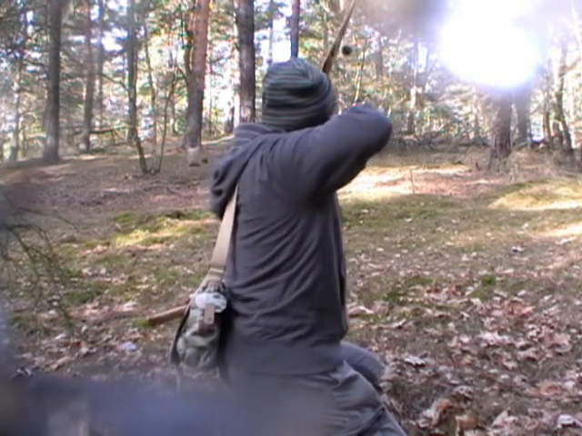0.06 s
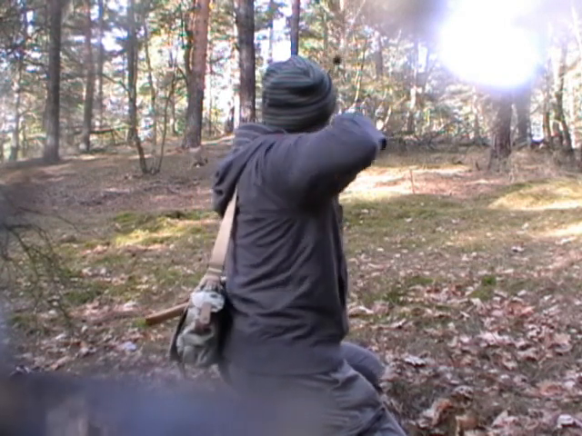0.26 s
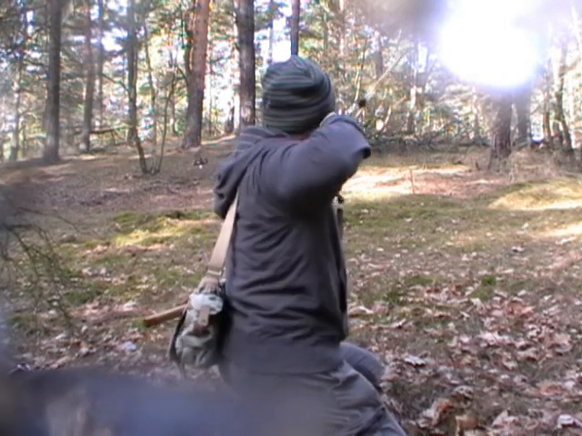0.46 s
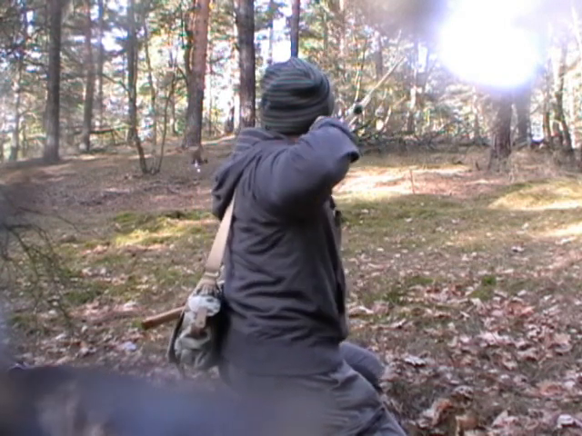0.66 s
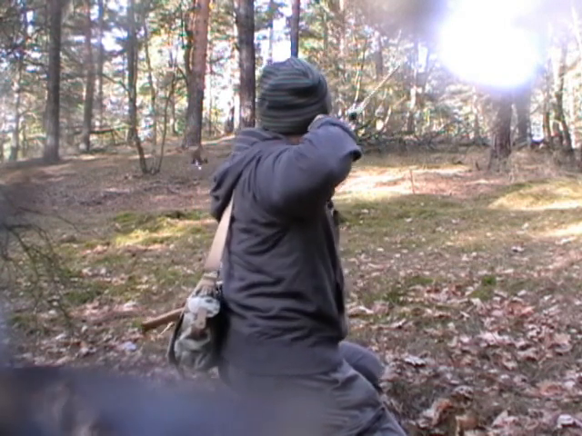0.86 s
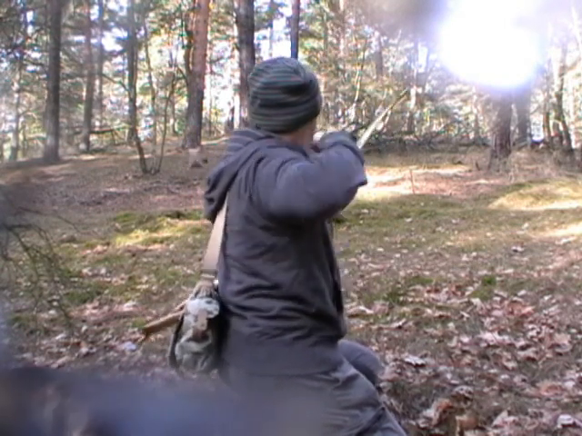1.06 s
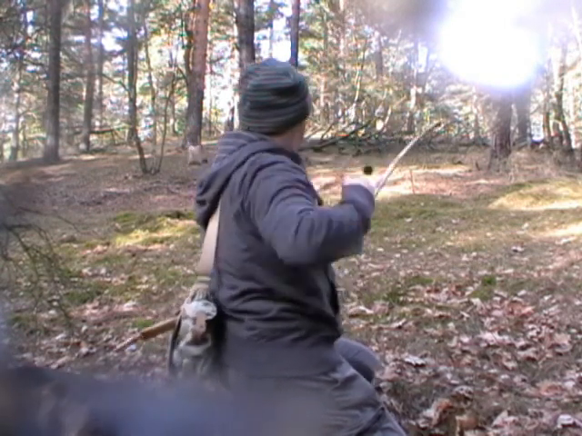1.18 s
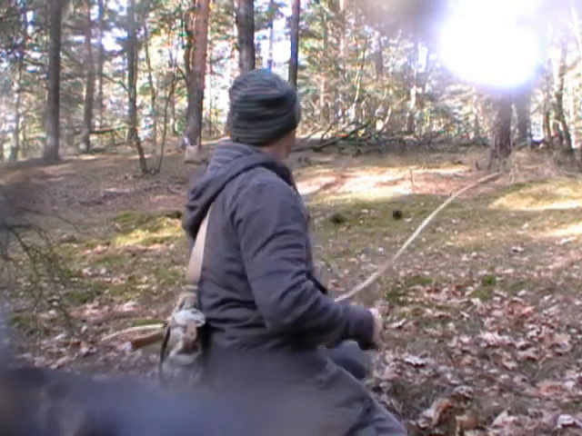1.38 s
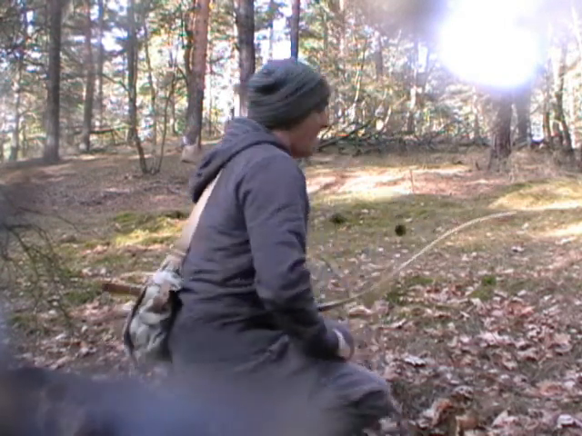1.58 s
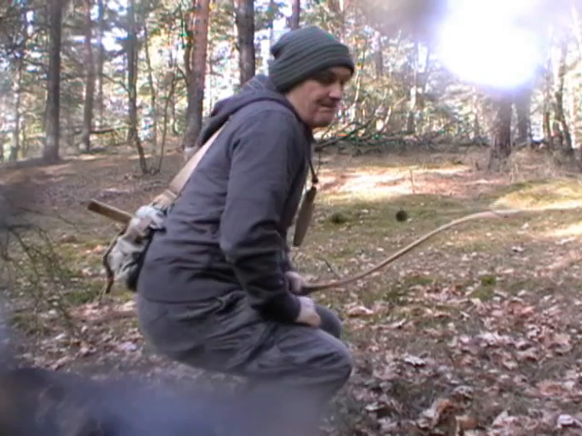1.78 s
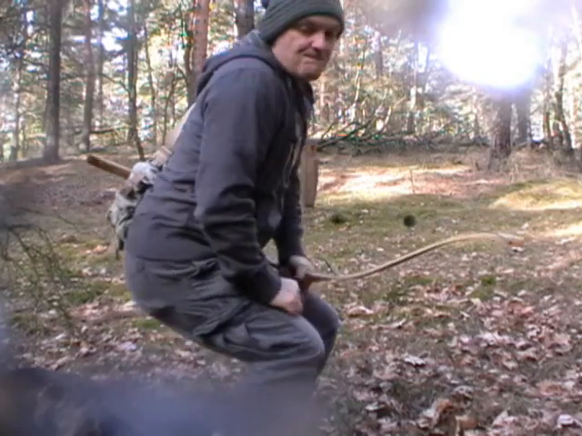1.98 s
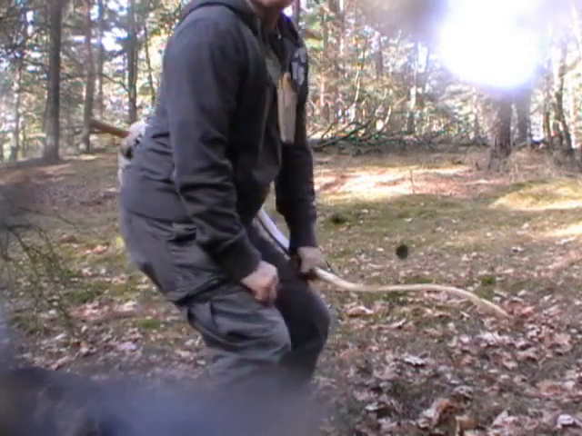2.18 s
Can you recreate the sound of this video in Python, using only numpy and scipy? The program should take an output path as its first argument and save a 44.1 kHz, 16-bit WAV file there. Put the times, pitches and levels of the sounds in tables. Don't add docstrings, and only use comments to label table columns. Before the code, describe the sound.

Bowstring twang and woody slap, short feather hiss, sharp arrow knock, then leaves and cloth rustling.

```python
import sys
import numpy as np
from scipy import signal
from scipy.fft import rfft, irfft, next_fast_len
from scipy.io import wavfile
from scipy.ndimage import uniform_filter1d, map_coordinates

SR = 44100
rng = np.random.default_rng(int(sys.argv[2]) if len(sys.argv) > 2 else 0)


def convert_level_to_amplitude(level_db):
    exponent = np.asarray(level_db, float) / 20
    return 10 ** exponent


def inscribe(sig):
    pcm = np.round(np.clip(np.atleast_2d(sig).T, -1, 1) * 32767)
    wavfile.write(sys.argv[1], SR, pcm.astype(np.int16))


N = 97020

# pitch_hz, level_db
AIR_COLOUR = [(71, -51), (120, -9.5), (436, -8.5), (874, -13.5), (1030, -16.5), (1550, -15), (3240, -21.5),
              (12000, -29), (16000, -33)]
# pitch_hz, level_db
CLOTH_COLOUR = [(180, -35), (300, -16), (555, -28), (870, -6.5), (1340, -7), (2170, -4.5), (2570, -6),
                (12100, -9.5), (16000, -13)]
# time_s, level_db
MOVES = [(.9, -91), (1.1, -75), (1.33, -70), (1.4, -61), (1.48, -63.5), (1.54, -54.5), (1.62, -60.5),
         (1.77, -56.5), (1.83, -63), (1.99, -62), (2.08, -64), (2.2, -60.5)]
# start_s, peak_db, pitch_hz
LEAF_TICKS = [(.0256, -43.5, 11900), (.058, -46.5, 4960), (.0805, -51, 6500), (.1015, -47, 4000),
              (.1824, -38, 5670), (.4625, -36, 6000), (.477, -29, 6000), (.7323, -33, 10900),
              (.755, -55, 11500), (.9722, -42, 9400), (.974, -40, 4740), (1.0003, -44, 8600),
              (1.031, -50, 7200), (1.1886, -47, 5000), (1.2146, -42.5, 5630), (1.29, -43.5, 10000),
              (1.298, -45, 7400), (1.425, -49, 5500), (1.472, -40.5, 8000), (1.5125, -39, 6600),
              (1.521, -48, 12500), (1.5372, -44, 11500), (1.5435, -42, 12500), (1.5582, -31, 8000),
              (1.617, -46, 11500), (1.6178, -38.5, 4540), (1.6305, -38, 11300), (1.6475, -42, 5240),
              (1.7145, -40, 4960), (1.738, -47, 4300), (1.7445, -31.5, 4530), (1.757, -26.5, 5100),
              (1.7575, -41, 12000), (1.793, -50, 8000), (1.846, -37, 12500), (1.8475, -36, 5530),
              (1.8938, -30, 7360), (1.8942, -40, 12500), (1.9018, -33, 6360), (1.913, -49, 6000),
              (1.922, -43, 6000), (1.949, -43, 6500), (1.973, -44, 7340), (1.9822, -37, 7500),
              (1.9865, -36, 6200), (1.994, -38, 6800), (2.07, -41, 7000), (2.121, -57, 6550),
              (2.1438, -51, 5500), (2.169, -30, 6140), (2.1693, -38, 13000), (2.172, -28.5, 6800),
              (2.199, -38, 9000)]
# start_s, peak_db, pitch_hz
WOOD_KNOCKS = [(.1826, -48, 2200), (.972, -43.5, 1140), (.9725, -48.5, 2200), (.992, -47, 990),
               (1.2146, -47, 2350), (1.496, -50, 900), (1.6465, -50, 3010), (1.714, -44.5, 2250),
               (1.7445, -44, 2320), (1.7575, -32, 2070), (1.785, -52, 2480), (1.8462, -43.5, 1690),
               (1.8468, -43, 2700), (1.889, -48, 1890), (2.165, -50, 2390), (2.1688, -50.5, 920)]
# start_s, peak_db, pitch_hz
STRING_CREAKS = [
    (.2047, -41, 2300),
    (.2075, -49, 3200),
    (.2108, -47, 3300),
    (.2128, -48, 1900),
    (.2155, -49, 2800),
    (.2182, -50, 3400),
    (.2203, -47, 2200),
]
# time_s, level_db
FLIGHT = [
    (.262, -42),
    (.29, -49),
    (.35, -51),
    (.41, -52),
    (.455, -41.5),
    (.49, -45),
    (.52, -54),
    (.575, -59.5),
]
# pitch_hz, level_db
FEATHER_COLOUR = [(1500, -25), (3000, -5), (6000, -6), (9500, -7), (12700, -4), (16000, -9.5)]
TARGET_TIMES = [.5808, .5826, .5842, .5855, .5872, .5901, .5930, .5952, .5985]
# ring_db, crack_db, share of the free ring time
TARGET_CONTACTS = [(-23.5, -24.5, 0.98), (-32, -29, 0.42), (-25.5, -21, 0.42), (-27, -18.5, 0.15),
                   (-30.5, -26, 0.53), (-10.5, -30, 0.39), (-30, -31, 0.44), (-26.5, -29, 0.47),
                   (-36, -26, 0.4)]
# pitch_hz, level_db, t60_s
TARGET_MODES = [(360, -11.5, 0.018), (650, -10, 0.015), (940, -11, 0.011), (1270, -6, 0.012),
                (1645, 4, 0.014), (2390, -3.5, 0.022), (2756, -6, 0.027), (3500, -15, 0.014)]
# start_s, level_db
THUDS = [
    (.608, -31.5),
    (0.624, -37),
    (0.638, -55),
    (.748, -45.5),
]
# time_s, level_db
SPRAY = [
    (.586, -75),
    (.599, -36.5),
    (.635, -42),
    (.664, -42.5),
    (.682, -50.5),
    (.74, -53.5),
    (.8, -67),
    (.88, -81),
]
# pitch_hz, level_db
LITTER_COLOUR = [(200, -18), (420, -3), (800, -13), (1700, 1), (3000, -1), (4200, -10), (6300, -3),
                 (16000, -20.5)]
SHAFT_TIMES = [.2403, .2417, .2431, .2443, .2505, .2530, .2555]
# ring_db, crack_db, share of the free ring time
SHAFT_CONTACTS = [(-43, -58, 0.22), (-27, -42, 0.29), (-20, -33, 0.16), (-15, -28.5, 0.6), (-37, -38, 0.2),
                  (-44, -41, .3), (-48, -48, 0.49)]
# pitch_hz, level_db, t60_s
SHAFT_MODES = [(1030, -8, 0.0087), (1360, -2.5, 0.0095), (1594, -2.5, 0.026), (2190, 8, 0.012),
               (2820, -0.5, 0.016), (3570, -7.5, 0.03)]
STRING_TIMES = [.2591, .2603, .2626, .2639, .2685, .2815]
# ring_db, crack_db, share of the free ring time
STRING_CONTACTS = [(-8, -34, 0.12), (-53, -19.5, 0.19), (-17.5, -35, 0.49), (-12.5, -23, 0.98),
                   (-50, -36, .2), (-25, -33.5, 0.17)]
# pitch_hz, level_db, t60_s
LIMB_MODES = [(373, -25, 0.038), (900, -13.5, 0.018), (1250, -21, 0.04), (1570, -1.5, 0.01),
              (1742, -2, 0.055), (2240, -5.5, 0.019), (2950, -11, 0.026), (3590, -10.5, 0.027)]
# pitch_hz, level_db
CRACK_COLOUR = [(300, -32), (900, -4), (2500, 2), (3700, -4), (5500, 1), (9000, -3.5), (16000, -11.5)]
# pitch_hz, t60_s
NEAR_T60 = [(500, 0.17), (12000, 0.022)]
# pitch_hz, t60_s
FAR_T60 = [(300, 0.86), (1500, 1.98), (3500, 1.44), (6000, 1.42), (14000, 0.25)]
# pitch_hz, t60_s
GROUND_T60 = [(500, 0.18), (8000, 0.048)]
# pitch_hz, level_db
ECHO_COLOUR = [(120, -57), (200, -28), (361, -25), (397, -39), (473, -14.5), (1560, 3), (2560, 1),
               (9000, -17), (11700, -61), (19800, -120)]
# pitch_hz, level_db
SPREAD = [(80, -4), (300, -42), (1100, -46), (1900, -19.5), (2600, -9.5), (8000, -9.5), (15000, -7.5)]
# pitch_hz, width_hz, level_db
HOUSING = [(465, 117, 8.5), (900, 137, 10.5), (1172, 111, 10), (1605, 265, 8.5), (2214, 135, 7.5),
           (2804, 103, 7), (3450, 124, 8), (12200, 370, 6)]
# pitch_hz, difference_db
TILT = [(400, -0.8), (1000, 1.2), (2400, -1.3), (6000, 4), (14000, 0.1)]
# pitch_hz, lead_radians
LEAD = [(400, 0.24), (1100, 0.013), (2000, 0.026), (4000, 0.38), (15000, 0.51)]

AIR_DB, HISS_DB, RUSTLE_DB = -64, -70.5, 2
SMOOTH_DB, LITTER_PATCH_DB = 0.8, 0.8
GRAINS_PER_S, GRAIN_DB, GRAIN_CAP_DB, CLUMP_DB = 1100, -7.5, 7, 1.5
KNOCK_T60, KNOCK_DB, KNOCK_ROUGH = 0.011, -1.5, 0.5
TICK_T60, TICK_DB, TICK_ROUGH = 0.0012, 4.5, 0.7
CREAK_T60, CREAK_ROUGH = 0.006, 0.8
RISE_CYCLES = 0.5
CRACK_T60, CRACK_RISE_S, RING_RISE_S, SCATTER_DB = 0.015, 0.00029, 0.0013, 1.5
THUD_HZ, THUD_T60 = 422, 0.016
BOW_FAR_DB, HIT_FAR_DB, FAR_RISE_S = -5, -10.5, 0.043
BOW_NEAR_DB, SMALL_ROOM_DB = -24, -15
LOW_CUT_HZ, TOP_HZ = 160, 16140


def unit(x):
    return x / np.sqrt(np.mean(x ** 2) + 1e-20)


def along(points, hz):
    f, v = np.transpose(points)
    return np.interp(np.log(hz + 1), np.log(f + 1), v)


def filtered(x, response):
    size = next_fast_len(x.shape[-1] + 8192)
    spectrum = rfft(x, size) * response(np.fft.rfftfreq(size, 1 / SR))
    return irfft(spectrum, size)[..., :x.shape[-1]]


def coloured(x, colour):
    return filtered(x, lambda hz: convert_level_to_amplitude(along(colour, hz)))


def level(rows):
    s, db = np.transpose(rows)
    return convert_level_to_amplitude(np.interp(np.arange(N) / SR, s, db, left=-120, right=-120))


def add(track, s, sound):
    track[..., round(s * SR):][..., :sound.shape[-1]] += sound


def diffuse(pair):
    side = coloured(pair[1], SPREAD)
    return np.array([pair[0] + side, pair[0] - side])


def rush(colour, patchy_db):
    z = signal.stft(rng.standard_normal((2, N)), nperseg=256)[2]
    field = uniform_filter1d(rng.standard_normal(z.shape[1:]), 6, 0)
    field = uniform_filter1d(field, 10, 1)
    pair = signal.istft(z * convert_level_to_amplitude(patchy_db * unit(field)), nperseg=256)[1][:, :N]
    return unit(diffuse(coloured(pair, colour)))


def trunks(x, t60, rise_s):
    hz, t, z = signal.stft(rng.standard_normal((2, 2 * SR)), SR, nperseg=256)
    fade = convert_level_to_amplitude(-60 * t / along(t60, hz)[:, None])
    swell = 1 - np.exp(-t / rise_s)
    tail = diffuse(signal.istft(z * fade * swell, SR, nperseg=256)[1])
    return signal.fftconvolve(x[None], tail / np.linalg.norm(tail[0]), axes=1)[:, :N]


def echo(s, far_db, rise_s):
    click = np.zeros(N)
    click[round(s * SR)] = convert_level_to_amplitude(far_db)
    return coloured(trunks(click, FAR_T60, rise_s), ECHO_COLOUR)


def air():
    return convert_level_to_amplitude(AIR_DB) * rush(AIR_COLOUR, SMOOTH_DB)


def grains():
    draw = rng.random((round(GRAINS_PER_S * N / SR), 3))
    s = draw[:, :1] * N / SR
    db = np.minimum(-4.5 * np.log(1 - draw[:, 1:2]), GRAIN_CAP_DB)
    hz = 4000 * 3 ** draw[:, 2:]
    t = np.arange(200) / SR
    rings = convert_level_to_amplitude(db - 60 * t * hz / 9) * np.sin(2 * np.pi * hz * t) * (1 - np.exp(-t * hz))
    places = (s * SR).astype(int) + np.arange(len(t))
    heap = np.bincount(places.ravel(), rings.ravel(), N + len(t))[:N]
    clumps = map_coordinates(rng.standard_normal(60), [np.arange(N) / SR * 22])
    return unit(heap * convert_level_to_amplitude(CLUMP_DB * clumps))


def rustle():
    cloth = rush(CLOTH_COLOUR, patchy_db=1.5)
    return level(MOVES) * convert_level_to_amplitude(RUSTLE_DB) * (cloth + convert_level_to_amplitude(GRAIN_DB) * grains())


def snaps(rows, t60, gain_db, rough):
    out, t = np.zeros(N + SR), np.arange(SR // 30) / SR
    for s, db, hz in rows:
        def resonance(f):
            return (f * hz / (hz * hz - f * f + 0.9j * f * hz)) ** 2
        skin = unit(filtered(rng.standard_normal(len(t)), resonance))
        life = convert_level_to_amplitude(db + gain_db - 60 * t / t60) * (1 - np.exp(-t * hz / RISE_CYCLES))
        add(out, s, life * (np.sin(2 * np.pi * hz * t) + rough * skin))
    return out[:N]


def small_sounds():
    small = snaps(WOOD_KNOCKS, KNOCK_T60, KNOCK_DB, KNOCK_ROUGH)
    small = small + snaps(LEAF_TICKS, TICK_T60, TICK_DB, TICK_ROUGH)
    small = small + snaps(STRING_CREAKS, CREAK_T60, 0, CREAK_ROUGH)
    return small + convert_level_to_amplitude(SMALL_ROOM_DB) * trunks(small, NEAR_T60, rise_s=0.0018)


def feathers():
    return level(FLIGHT) * rush(FEATHER_COLOUR, SMOOTH_DB)


def blows(times, contacts, modes):
    out, t = np.zeros((2, N + SR)), np.arange(SR // 8) / SR
    for s, (ring_db, crack_db, share) in zip(times, contacts):
        ring = 0
        for hz, db, t60 in modes:
            fade = convert_level_to_amplitude(db + SCATTER_DB * rng.normal() - 60 * t / t60 / share)
            ring = ring + fade * np.sin(2 * np.pi * hz * t)
        ring = ring * (1 - np.exp(-t / RING_RISE_S / share))
        crack = unit(diffuse(coloured(rng.standard_normal((2, len(t))), CRACK_COLOUR)))
        crack = crack * (1 - np.exp(-t / CRACK_RISE_S))
        add(out, s, convert_level_to_amplitude(ring_db) * ring + convert_level_to_amplitude(crack_db - 60 * t / CRACK_T60) * crack)
    return out[:, :N]


def target():
    strike = blows(TARGET_TIMES, TARGET_CONTACTS, TARGET_MODES)
    thud_times = [s for s, db in THUDS]
    thud_contacts = [(db, db - 14, 1) for s, db in THUDS]
    rocks = blows(thud_times, thud_contacts, [(THUD_HZ, 0, THUD_T60), (310, -4, 0.03)])
    spray = level(SPRAY) * (rush(LITTER_COLOUR, LITTER_PATCH_DB) + 0.18 * grains())
    return strike + rocks + spray + echo(TARGET_TIMES[0], HIT_FAR_DB, rise_s=0.011)


def bow():
    slap = blows(SHAFT_TIMES, SHAFT_CONTACTS, SHAFT_MODES)
    snap = blows(STRING_TIMES, STRING_CONTACTS, LIMB_MODES)
    direct = -slap - snap
    near = convert_level_to_amplitude(BOW_NEAR_DB) * trunks(direct.mean(axis=0), GROUND_T60, rise_s=0.0017)
    return direct + near + echo(STRING_TIMES[0], BOW_FAR_DB, FAR_RISE_S)


def scene():
    return air() + rustle() + small_sounds() + feathers() + target() + bow()


def low_pass(x):
    return signal.sosfilt(signal.butter(12, 16680, fs=SR, output="sos"), x)


def record(dry):
    def ports(hz):
        body = 1
        for centre, width, db in HOUSING:
            peak = 1j * hz * width / (centre * centre - hz * hz + 1j * hz * width)
            body = body + (convert_level_to_amplitude(db) - 1) * peak
        cut = (hz * hz / (hz * hz - LOW_CUT_HZ ** 2 - 1.4j * hz * LOW_CUT_HZ)) ** 2
        half = convert_level_to_amplitude(along(TILT, hz) / 2) * np.exp(0.5j * along(LEAD, hz))
        return convert_level_to_amplitude(-3.5) * body * cut * np.array([half, 1 / half])

    hiss_colour = [(60, -0.5), (300, 8.0), (4000, 2.0)]  # pitch_hz, level_db
    hiss = convert_level_to_amplitude(HISS_DB) * coloured(rng.standard_normal(dry.shape), hiss_colour)
    mix = filtered(filtered(dry, ports) + hiss, lambda hz: hz < TOP_HZ)
    return low_pass(mix)


dry = scene()
out = record(dry)
inscribe(out)
```